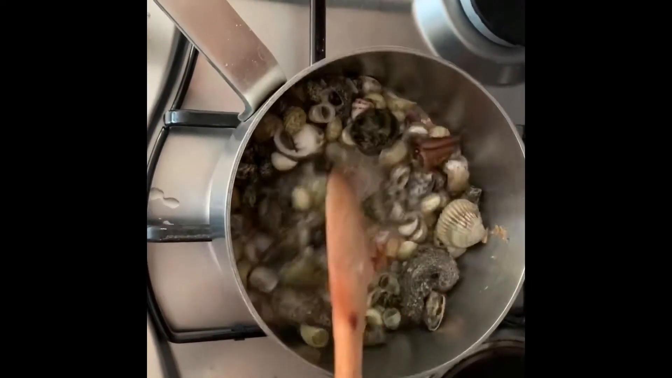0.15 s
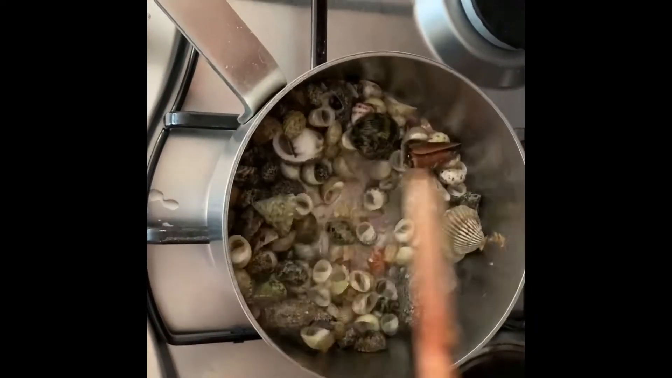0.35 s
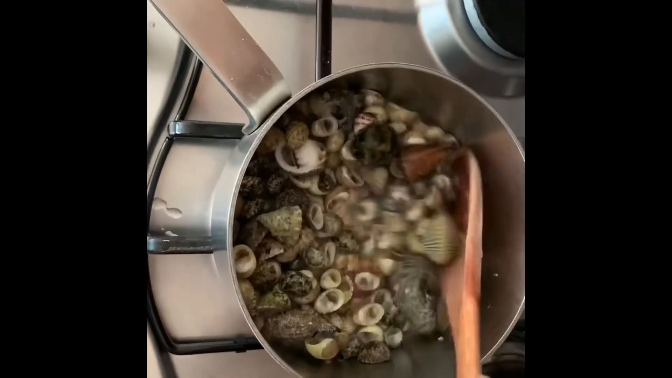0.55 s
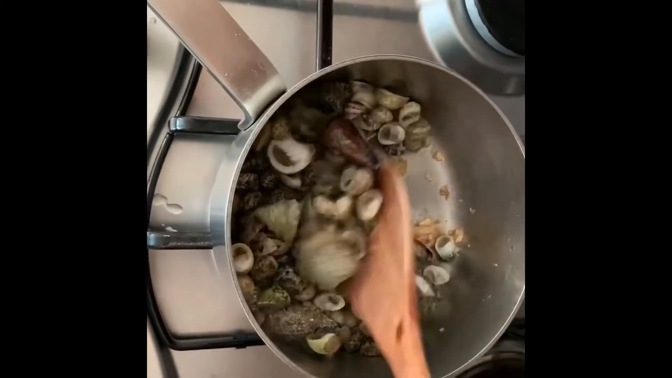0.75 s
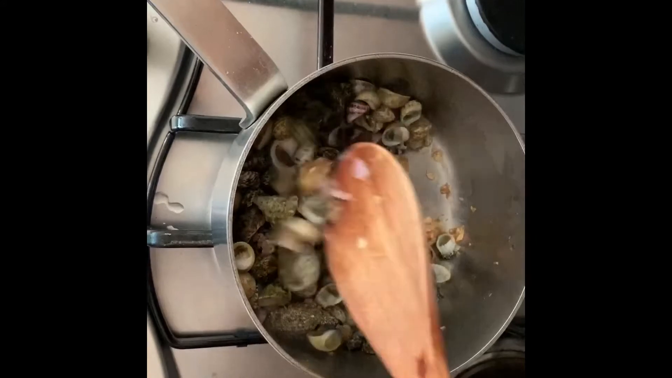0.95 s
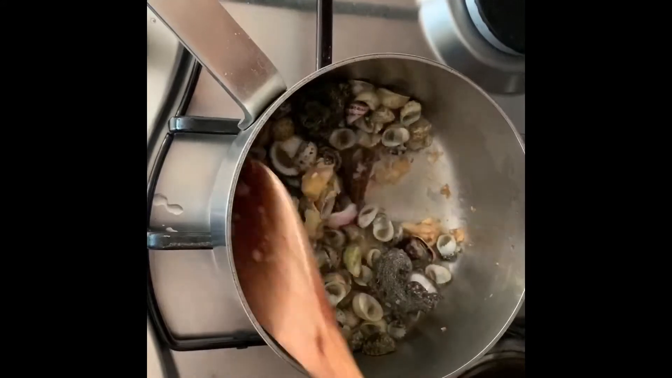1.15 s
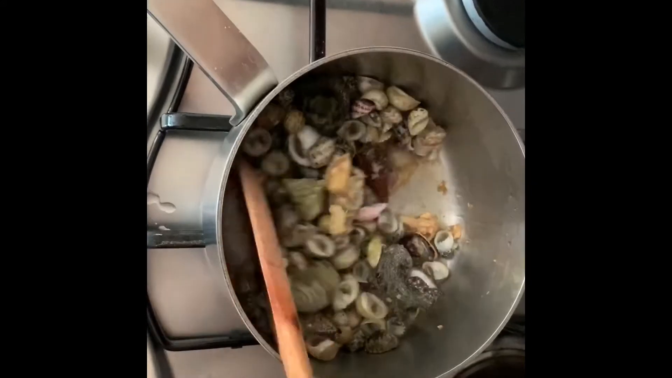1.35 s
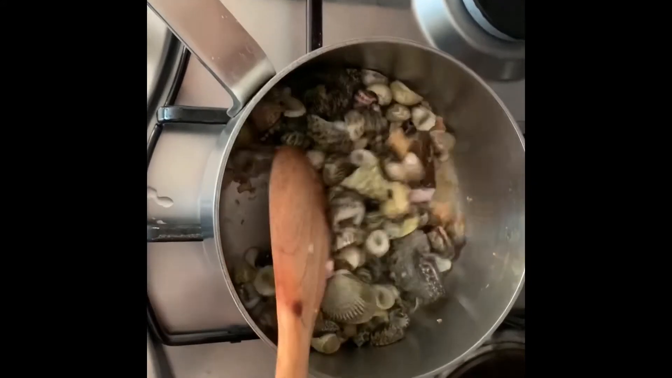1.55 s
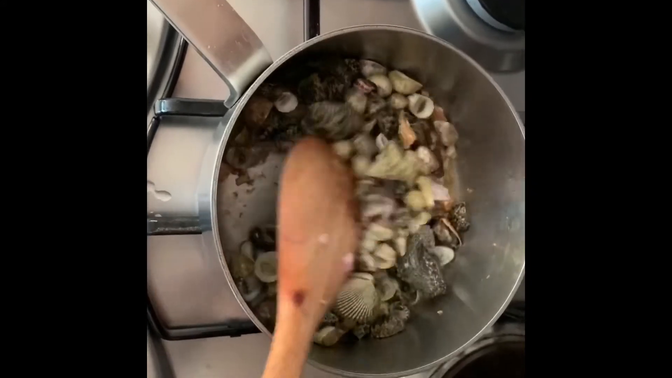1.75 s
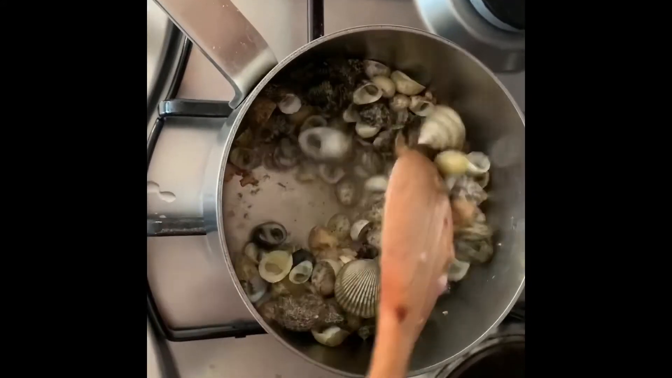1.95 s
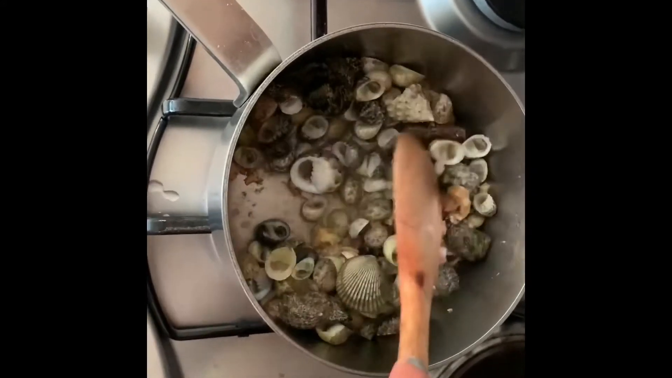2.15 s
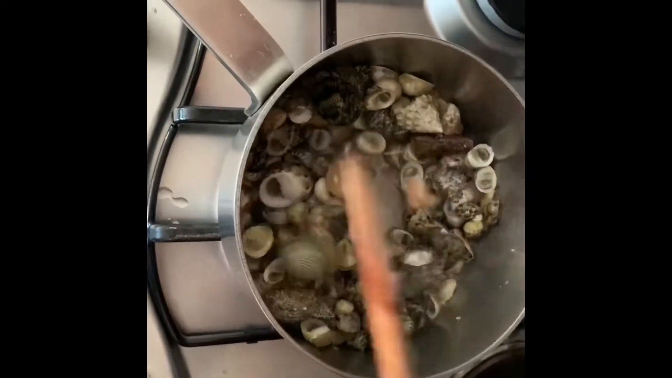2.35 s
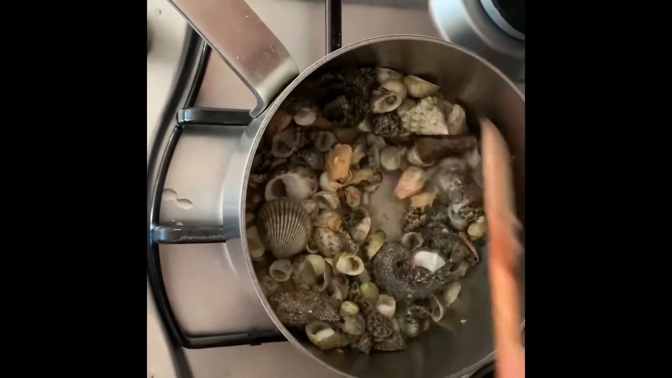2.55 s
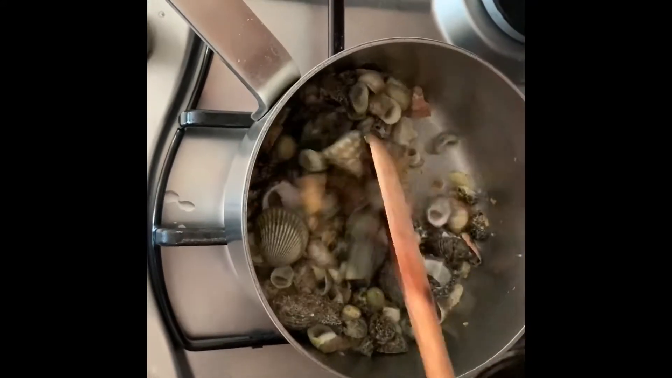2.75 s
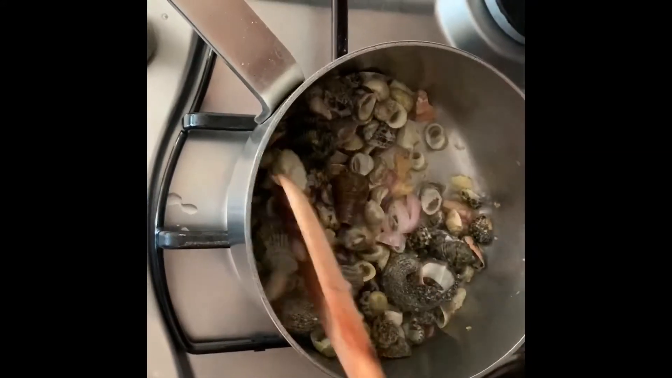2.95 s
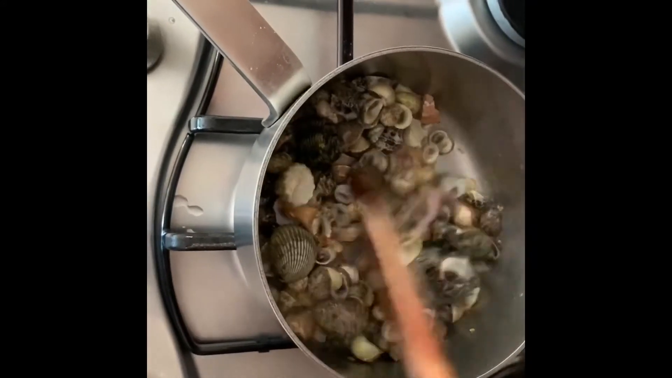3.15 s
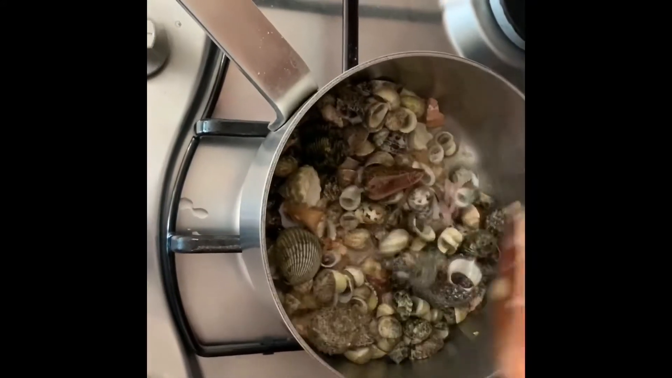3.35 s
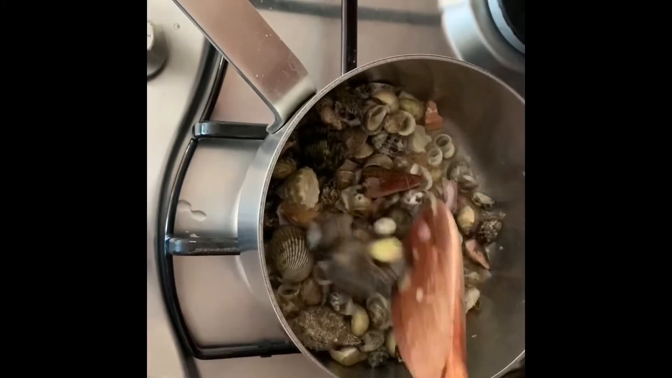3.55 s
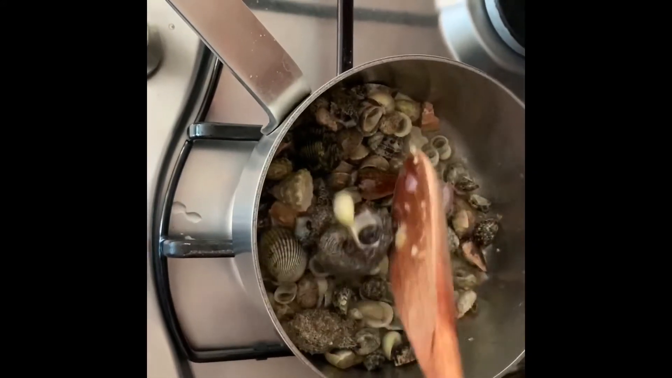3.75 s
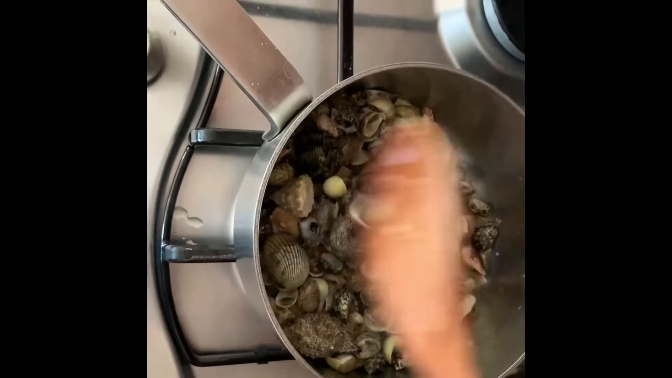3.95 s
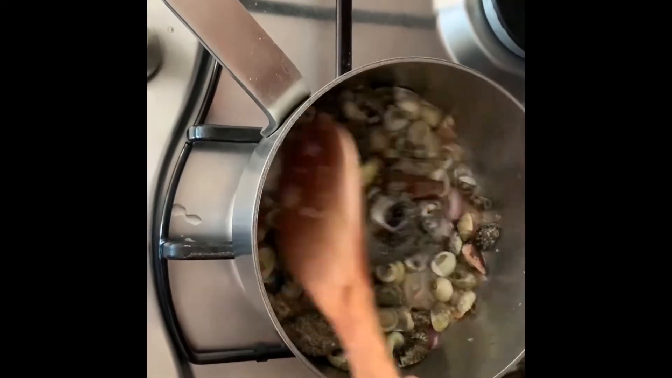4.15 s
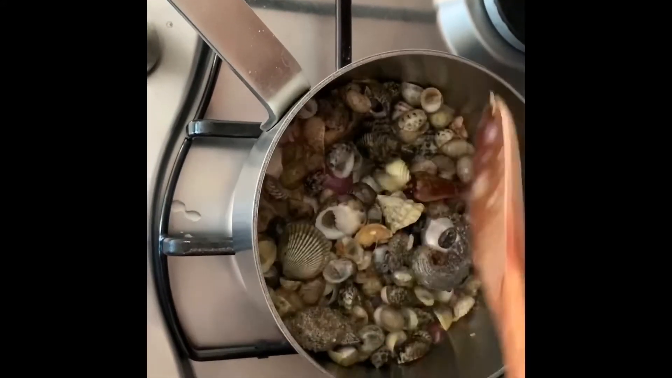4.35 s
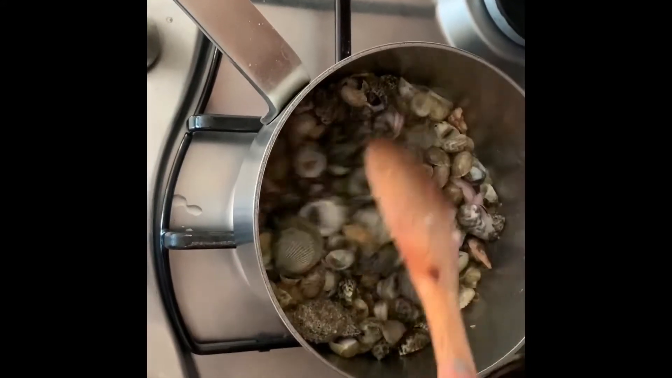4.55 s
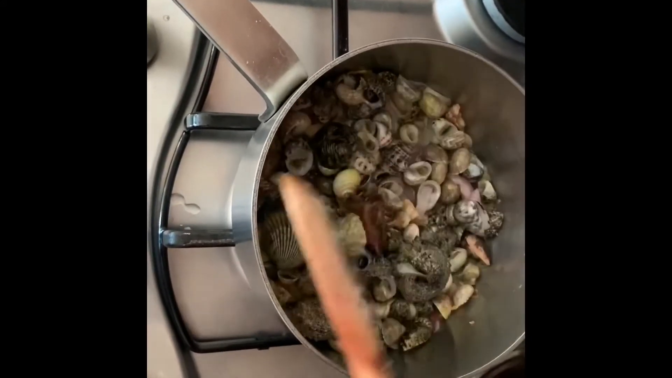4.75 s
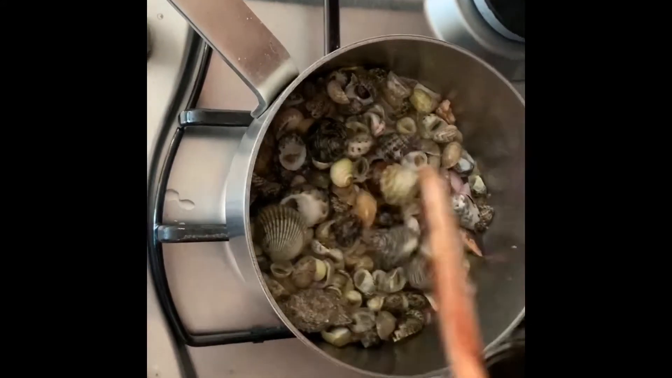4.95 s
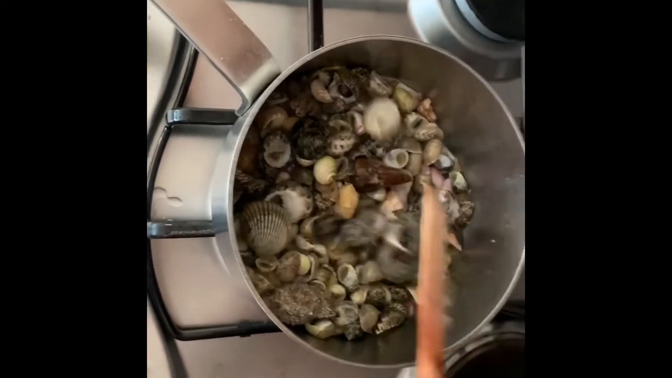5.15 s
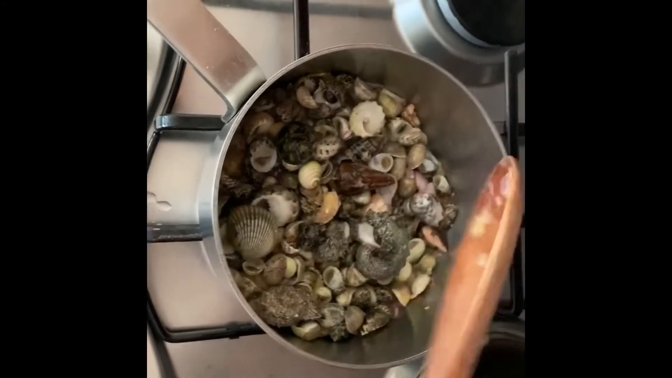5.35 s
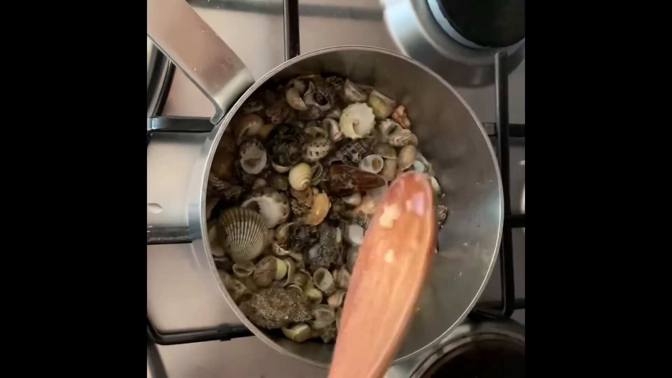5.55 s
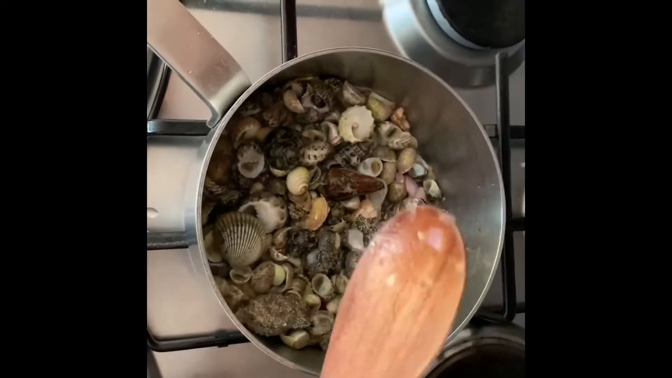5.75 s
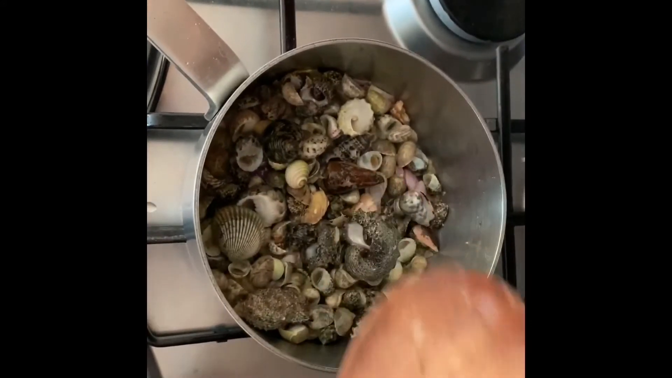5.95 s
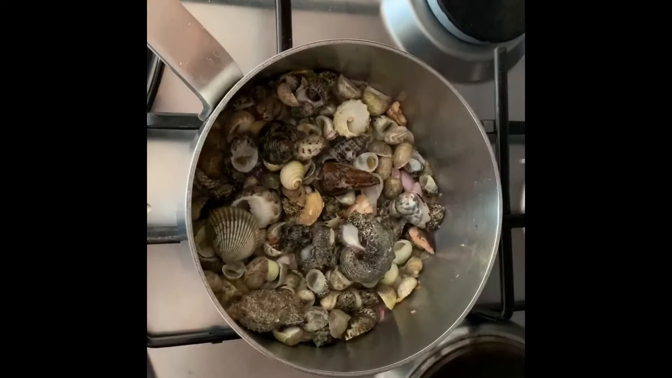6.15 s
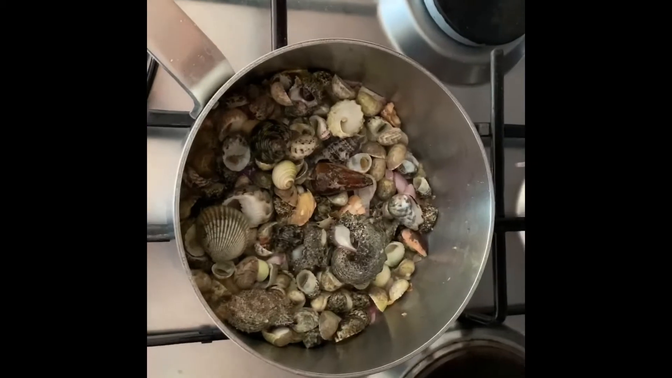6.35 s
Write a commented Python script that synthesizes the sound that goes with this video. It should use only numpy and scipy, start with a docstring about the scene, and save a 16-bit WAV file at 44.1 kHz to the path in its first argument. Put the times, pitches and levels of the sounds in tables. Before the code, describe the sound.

Two microphones close above a steel pot in a small kitchen catch a crackling, wet sizzle, loudest at 0 s and slowly sinking throughout. Stirring is already under way: shells rustle in uneven surges, with dry high clicks and short, lower knocks on steel. A faint airy whistle hovers and drops away by 1.4 s. Around 0.92-0.99 s a large shell gives a rapid cluster of bright ringing clinks; a strong one follows at 1.87 s, another at 2.9 s. Clicking is dense from 1.8 to 3 s. The spoon edge raps the wall at 3.3 s and harder at 3.95 s, with soft low bumps as the pot shifts. Sharp clicks cluster at 4.36 s, more bumps come near 5.05 s, then stirring thins. At 5.54 and 5.72 s the flat spoon pats the heap, each a hollow pop with a brief rattle. Faint fizz, settling ticks and low burner-fan hum remain.

```python
"""Shellfish sizzle in a hot steel pot on a gas hob while a wooden spoon stirs them; the kitchen hums low.
From the start bubbles pop, the heap rustles and clicks, and a faint whistle sinks away by 1.4 s.
Near 0.9 s a large shell clinks with ringing notes, and again later; the pot shifts with dull pushes.
From 3.3 s the spoon knocks the wall twice; near 5.6 s it pats the heap twice, a hollow pop and a rattle.
Pops and hiss are shaped noise, blows are fading tones; two spaced microphones listen from above."""
import sys
import numpy as np
from scipy import signal
from scipy.fft import rfft, irfft, next_fast_len
from scipy.io import wavfile
from scipy.ndimage import uniform_filter1d

SR = 44100
rng = np.random.default_rng(int(sys.argv[2]) if len(sys.argv) > 2 else 0)


def bounce(signal):
    """Save signal as a 16-bit WAV file at the path given by the first command-line argument."""
    frames = np.transpose(np.atleast_2d(signal))
    limited = np.clip(frames, -1, 1)
    pcm = np.round(limited * 32767).astype(np.int16)
    wavfile.write(sys.argv[1], SR, pcm)


N = 286634

# loudness of the frying liquid: (time [s], level [dB])
SIZZLE_LEVEL = [(0, -29), (1.1, -32.5), (2.1, -35), (3.7, -35.5), (4.7, -39.5), (5.5, -40), (6.5, -44)]
# tone colour of the bursting bubbles: (frequency [Hz], relative level [dB per Hz])
FIZZ_COLOUR = [(300, -34), (700, -9), (1500, -9.5), (3000, -5.5), (6000, -5), (8600, -3), (11000, -2.5),
               (15700, -2.5)]
# tone colour of shells rubbing together: (frequency [Hz], relative level [dB per Hz])
RUSTLE_COLOUR = [(600, -29), (1500, -13), (3000, -5), (5000, -0.5), (8000, 2), (11000, 1.5), (13500, -1),
                 (15700, -10)]
# resonances of the air in the pot: (frequency [Hz], width [Hz], relative level [dB])
POT_AIR = [(324, 120, -11.5), (933, 190, 0.5), (1170, 130, 0.5), (1560, 580, -0.5), (2200, 400, -1)]
# loudest contacts of shell on shell: (time [s], peak [dB], pitch [Hz])
CLICKS = [(0.1745, -5.5, 6870), (0.2575, -12, 6980), (0.401, -13, 6930), (0.4275, -10, 7300),
          (0.452, -12, 11500), (0.6906, -18, 6500), (0.8718, -16, 11600), (1.434, -20, 10900),
          (1.699, -16.5, 11200), (1.8006, -20, 10900), (1.829, -8, 10700), (1.8411, -6.5, 8340),
          (1.8787, -3, 6520), (1.9443, -14, 8500), (2.029, -13, 6920), (2.182, -11, 7190),
          (2.208, -11.5, 7080), (2.237, -17, 7610), (2.273, -18, 7000), (2.333, -15, 10200),
          (2.4632, -11.5, 7940), (2.4959, -6.5, 10230), (2.5214, -12, 10800), (2.5506, -19, 5400),
          (2.604, -14, 10500), (2.612, -13, 5310), (2.6535, -15, 6860), (2.6639, -10, 6400),
          (2.7125, -9, 10800), (2.79, -21, 7000), (2.81, -13.5, 7000), (2.823, -12, 11700),
          (2.841, -13, 10600), (2.8725, -13.5, 10200), (2.9754, -12, 7500), (2.984, -8.5, 6960),
          (3.101, -16, 7300), (3.138, -16, 11600), (3.187, -21, 10500), (3.3475, -12, 6930),
          (3.3845, -14, 10500), (3.3995, -12, 10800), (3.424, -16, 7000), (3.742, -20, 7080),
          (3.972, -11, 5900), (4.1205, -18, 6650), (4.145, -16, 7000), (4.3597, -6.5, 11170),
          (4.362, -2.5, 7070), (4.3669, -6, 7400), (4.3737, -14, 11000), (4.4589, -9, 7080),
          (4.546, -15, 6600), (4.564, -11.5, 5950), (4.7674, -20, 7140), (4.822, -15, 11000),
          (4.844, -26, 10400), (4.956, -32, 14500), (5.0671, -12, 6450), (5.0908, -16, 7240),
          (5.5437, -16, 6920), (5.721, -17, 6600), (5.7323, -11, 7300), (5.7417, -20, 7100)]
# loudest contacts of shell or spoon on steel: (time [s], peak [dB], pitch [Hz], time to fade 60 dB [s])
KNOCKS = [(0.172, -22, 1440, 0.016), (0.359, -26, 880, 0.017), (0.385, -21, 880, 0.013),
          (0.417, -21, 2840, 0.018), (0.646, -19, 1350, 0.017), (0.857, -19, 1480, 0.012),
          (1.045, -19, 937, 0.016), (1.058, -21, 1200, 0.011), (1.0675, -19, 1200, 0.011),
          (1.0885, -22, 1020, 0.012), (1.1, -21.5, 1560, 0.016), (1.141, -19, 2300, 0.02),
          (1.771, -24, 1140, 0.021), (1.823, -12, 1123, 0.039), (2.026, -17, 1070, 0.018),
          (2.182, -13.5, 2160, 0.012), (2.206, -24, 1360, 0.024), (2.236, -18, 2020, 0.012),
          (2.331, -28, 869, 0.018), (2.362, -22, 1170, 0.02), (2.461, -13, 1000, 0.013),
          (2.5063, -14.5, 1830, 0.0096), (2.527, -15.5, 2100, 0.018), (2.546, -19.5, 1115, 0.028),
          (2.554, -21, 2060, 0.02), (2.565, -25, 975, 0.017), (2.616, -21, 2430, 0.018),
          (2.632, -23.5, 1020, 0.055), (2.664, -24, 930, 0.018), (2.74, -24, 1000, 0.016),
          (2.806, -23, 1640, 0.023), (2.821, -23, 1520, 0.016), (2.872, -18, 1660, 0.021),
          (2.975, -11.5, 1380, 0.01), (2.981, -16, 1490, 0.017), (3.099, -25, 1450, 0.017),
          (3.349, -19, 845, 0.022), (3.389, -16.5, 1560, 0.021), (3.394, -18, 1560, 0.038),
          (4.104, -26, 1070, 0.022), (4.121, -10, 1300, 0.031), (4.318, -20.5, 920, 0.025),
          (4.361, -15, 2130, 0.025), (4.367, -13.5, 940, 0.032), (4.448, -23, 1190, 0.02),
          (4.492, -23, 1050, 0.024), (4.545, -26, 1000, 0.027), (4.726, -26.5, 750, 0.042),
          (4.753, -19, 1560, 0.017), (4.765, -29, 1000, 0.016), (4.84, -29, 2000, 0.017),
          (5.015, -24, 816, 0.019), (5.078, -24, 870, 0.027), (5.192, -23.5, 1120, 0.014)]
# blows on the large shell:
# (time [s], peak of upper notes [dB], brightness [dB per octave], peak of lowest note [dB])
CLINKS = [(0.9195, -11, 24, -38), (0.9366, -4, 6, -43), (0.9535, -10, 17, -34), (0.973, -6.5, 8, -35),
          (0.9864, -22, 17, -36), (1.8681, -1.5, -13, -22), (1.909, -13, 9, -41), (2.895, -16, -6, -28.5),
          (3.951, -27, 0, -26)]
# notes of the large shell, lowest first: (frequency [Hz], relative level [dB], time to fade 60 dB [s])
SHELL_NOTES = [(3883, 0, 0.18), (5360, -10, 0.05), (6580, -2, 0.091), (6930, -6, 0.062), (7275, 5, 0.042),
               (7480, 2, 0.025), (8100, 4, 0.048), (8450, 3, 0.054), (9080, -2, 0.038), (9800, -8, 0.047),
               (10440, -9.5, 0.18), (11400, -11, 0.033), (12050, -9, .03), (13950, -18, 0.067)]
# the spoon edge meets the wall: (time [s], peak [dB], brightness [dB per octave])
RAPS = [(3.293, -13.5, -10), (3.951, -5.5, 2.5)]
# notes of the pot wall: (frequency [Hz], relative level [dB], time to fade 60 dB [s])
WALL_NOTES = [(929, -13, 0.085), (1095, 6.5, 0.014), (1300, -13.5, 0.069), (1770, -11, 0.099),
              (2130, -19, 0.35), (2370, 9.5, 0.008), (2680, -20, 0.24), (3220, -8.5, 0.026)]
# the flat of the spoon pats the heap: (time [s], peak [dB])
PATS = [(5.5389, -6), (5.723, -7.5)]
# notes of pot and hob: (frequency [Hz], relative level [dB], time to fade 60 dB [s])
BODY_NOTES = [(65.2, -28.5, 0.53), (136.2, -27, 0.36), (189.6, -24, 0.19), (233.6, -31.5, 0.33),
              (317, -29, 0.046), (425, -37, 0.11), (747, -26.5, 0.26), (869, 8.5, 0.011), (890, -33, 0.14),
              (1015, -32, .2), (1276, -33, 0.22), (1440, -38, 0.3)]
# low bands of burner and fan: (frequency [Hz], width [Hz], level [dB])
HUM_BANDS = [(67, 53, -80), (130.4, 13.2, -52.5), (187.7, 14.5, -60.5), (245, 40, -62.5), (845, 220, -58),
             (1666, 170, -56.5)]
# tone colour of the dull roar below them: (frequency [Hz], relative level [dB per Hz])
ROAR_COLOUR = [(25, -36), (60, 6.5), (150, 0.5), (350, 0), (550, -7.5), (1000, -15.5), (3000, -36),
               (5000, -42)]
# how far the right microphone lags: (frequency [Hz], lag [half-turns])
MIC_LAG = [(0, 0), (860, .13), (1550, .04), (2300, .3), (3400, .44), (4700, 1), (6800, 2), (8900, 3),
           (11000, 4), (13100, 5), (14900, 6)]
# balance of the microphones: (frequency [Hz], left minus right [dB])
MIC_BALANCE = [(60, -1.5), (180, -4), (550, -6), (1650, -1.5), (4970, 0.5), (15000, 0)]
# tone colour of the shaken heap: (frequency [Hz], relative level [dB per Hz])
RATTLE_COLOUR = [(120, -3.5), (300, 2.5), (900, -10.5), (1500, -6.5), (2600, -14), (4000, -11.5),
                 (7000, -10), (10000, -11.5), (15000, -28)]
# the pot shifts on its grate: (time of middle [s], peak before roughness [dB], pitch [Hz], half length [s])
BUMPS = [(1.103, -45, 223.5, 0.14), (2.876, -43, 217, 0.18), (3.285, -41, 207, 0.04),
         (3.372, -37.5, 179, 0.087), (3.979, -38, 215, 0.053), (4.381, -45, 245, 0.15),
         (4.761, -41, 224, 0.05), (5.038, -35, 200, 0.023), (5.062, -31, 197, 0.021)]
# a faint airy whistle that sinks at its end: (time [s], pitch [Hz], level [dB])
WHISTLE_CURVE = [(0, 1497, -51), (.75, 1440, -40.5), (.9, 1526, -49), (1.2, 1518, -45.5), (1.27, 1437, -41),
                 (1.33, 1300, -47), (1.4, 1290, -80)]
# each push of the spoon through the heap:
# (peak time [s], rise [s], fall [s], shell rustle [dB], rumble on the pot floor [dB])
PUSHES = [(.0, 0.12, 0.13, -32, -37.5), (.17, 0.083, 0.28, -26.5, -40.5), (0.429, 0.084, 0.075, -24, -33),
          (0.59, 0.047, 0.089, -25, -35), (.645, 0.14, .11, -24.5, -45), (.93, 1, 0.037, -31, -44),
          (1.09, 0.05, 0.048, -37, -37), (1.12, 0.052, 0.057, -25.5, -48), (1.46, 0.46, 0.17, -34, -42.5),
          (1.86, 0.24, 0.14, -29, -37.5), (2.21, 0.15, 0.14, -27.5, -38), (2.36, 0.092, 0.11, -34, -39.5),
          (2.479, 0.035, 0.099, -28.5, -32.5), (2.55, 0.076, 0.33, -26, -36.5),
          (2.83, 0.2, 0.13, -31, -38.5), (2.99, 0.08, 0.22, -28, -37), (3.39, 0.12, 0.09, -24.5, -38),
          (3.98, 0.016, 0.077, -22.5, -30.5), (4.15, 0.093, 0.06, -23, -33.5),
          (4.37, 0.012, 0.31, -31, -51), (4.52, 0.16, 0.07, -28, -35.5), (4.77, 0.036, 0.078, -31, -36),
          (4.84, .06, 0.032, -33, -41), (5.09, 0.066, 0.051, -31, -39)]
# the heap between pushes: (time [s], rustle [dB], rumble [dB])
SETTLING = [(0, -37, -60), (2.0, -46, -82), (3.6, -46.5, -47.5), (4.7, -52, -61), (5.4, -50, -54),
            (6.5, -46, -58)]

EDGE_HZ = 15800  # top of the sound that the microphones keep
PAD = next_fast_len(N + 12000)
HZ = np.fft.rfftfreq(PAD, 1 / SR)
AFTER = np.arange(16000) / SR  # time since a blow [s]
SWELL_DB = 12  # a push climbs this much in its rise time and drops this much in its fall time
LOOSE_PER_S = 90  # small unplanned contacts each second
TICK_S = .00008  # how long two hard surfaces touch
CLICK_T60_S = 0.029
# smallest peaks over the rustle and the rumble, roughly, and how unevenly the peaks exceed them
LOOSE_CLICK_DB, LOOSE_KNOCK_DB, LOOSE_SPREAD_DB = 4, 4.5, 1.8
LOOSE_CLICK_T60_S, LOOSE_KNOCK_T60_S = 0.04, 0.02


def amp(db):
    """Turns a level in dB into a gain."""
    return 10 ** (np.asarray(db) / 20)


def evened(x):
    """Scales a sound to an rms of 1."""
    return x / np.sqrt(np.mean(x ** 2) + 1e-20)


def read(points, hz):
    """Reads a tone colour table at any frequency, on a logarithmic pitch scale."""
    f, value = np.transpose(points)
    return np.interp(np.log(hz + 1), np.log(f + 1), value)


def follow(rows, axis):
    """Draws one column of a time table as a curve with a value for every sample."""
    rows = np.array(rows)
    return np.interp(np.arange(N) / SR, rows[:, 0], rows[:, axis])


def shaped(x, gain):
    """Gives a sound a tone colour and an rms of 1."""
    return evened(irfft(rfft(x, PAD) * gain, PAD)[..., :N])


def peaks(modes):
    """Adds the power of several resonances; the width is taken 6 dB below each top."""
    power = 0
    for hz, width, db in modes:
        power = power + amp(2 * db) / (1 + (2 * (HZ - hz) / width) ** 2) ** 2 / width
    return np.sqrt(power)


def add(mix, s, sound):
    """Adds a sound to the mix at a time in seconds."""
    part = mix[round(s * SR):][:len(sound)]
    part += sound[:len(part)]


def smooth_noise(shape, size):
    """Averages noise twice so that it drifts slowly."""
    return uniform_filter1d(uniform_filter1d(rng.standard_normal(shape), size=size), size=size)


def grains(per_s, spread_db, wet, tail_s, ring_share, low_hz, count=12):
    """Sparse uneven pops from several places, each with a short ring and a smear off the pot walls."""
    size = amp(spread_db * np.minimum(rng.exponential(1, N), 5))
    size = size * (rng.random(N) < per_s / SR)
    place = rng.integers(0, count, N)
    t = AFTER[:4096]
    out = np.zeros((2, N))
    for k, hz in enumerate(np.geomspace(low_hz, 6 * low_hz, count)):
        pop = (t == 0) + ring_share * np.sin(2 * np.pi * hz * t) * amp(-60 * t / 0.056)
        smear = rng.standard_normal((2, len(t))) * amp(-60 * t / tail_s)  # different in each ear
        both = pop + wet * smear / np.linalg.norm(smear[0])
        out += signal.oaconvolve((size * (place == k))[None], both, axes=1)[:, :N]
    return out


def burst(hz, t60, spread, crack, tick, rise_turns):
    """A small hard contact: a broad tick, a sharp crack and a few short notes; peak 1."""
    t = AFTER[:3072]
    notes = 2.6 * np.sin(2 * np.pi * hz * t)
    for c in rng.uniform(-.3, 1, 4):  # four more notes, mostly above the first
        notes += np.sin(2 * np.pi * hz * np.exp(spread * c) * t)
    white = rng.standard_normal(len(t))
    noise = signal.lfilter([1, .6, -1, -.6], [1], white)  # broad, without bass or the very top
    snap = crack * noise * (amp(-60 * t / 0.065) + 2.75 * amp(-60 * t / 0.011))
    snap += tick * (1 - t / TICK_S) * np.exp(-t / TICK_S)
    swell = 1 - np.exp(-(t * hz / rise_turns) ** 2)
    out = (notes * swell + snap) * amp(-60 * t / max(t60, .004))
    return np.sign(white[0]) * out / abs(out).max()  # pushes first inwards or outwards by chance


def ring(modes, tilt_db, scatter_db, rise_s, slow_hz=0, waver=0):
    """One blow starts fading notes of uneven strength that may waver, those under slow_hz swelling later; peak 1."""
    chance = rng.standard_normal(len(modes))
    drift = evened(smooth_noise((len(modes), len(AFTER)), 800))
    drift = 1 + waver * drift * np.minimum(AFTER / 0.022, 1)
    out = np.zeros(len(AFTER))
    for (hz, db, t60), c, d in zip(modes, chance, drift):
        level = amp(db + scatter_db * c + tilt_db * np.log2(hz / 7000) - 60 * AFTER / t60)
        swell = 1 - np.exp(-(AFTER / (rise_s * max(1, slow_hz / hz))) ** 2)
        out += level * swell * d * np.sin(2 * np.pi * hz * AFTER)
    return out / abs(out).max()


def sizzle():
    """Tiny bubbles burst by the thousand in the frying liquid."""
    pops = grains(4000, 3.64, 1.0, 0.07, 0.049, 2000)
    return amp(follow(SIZZLE_LEVEL, axis=1)) * shaped(pops, amp(read(FIZZ_COLOUR, HZ)))


def effort(axis):
    """Level of one layer of the stirring (0 rustle, 1 rumble): the settling heap plus every push."""
    t = np.arange(0, N + 64, 64) / SR
    power = np.zeros(len(t))
    for peak_s, rise_s, fall_s, *levels in PUSHES:
        away = np.maximum((peak_s - t) / rise_s, (t - peak_s) / fall_s)
        power += amp(levels[axis] - SWELL_DB * away) ** 2
    settling = amp(follow(SETTLING, axis=axis + 1))
    return np.sqrt(np.interp(np.arange(N) / SR, t, power) + settling ** 2)


def stirring():
    """Shells tick against each other in clumps, and bump the floor of the pot, which colours them."""
    clumps = amp(1.2 * evened(uniform_filter1d(rng.standard_normal(N), 450)))
    ticks = grains(2000, 2.93, 0.63, 0.066, 0.086, 2500, count=24)
    rustle = shaped(ticks * clumps, amp(read(RUSTLE_COLOUR, HZ)))
    thuds = grains(300, 2.5, 0.63, 0.087, 0.031, 799)
    rumble = shaped(thuds * clumps, peaks(POT_AIR))
    return effort(axis=0) * rustle + effort(axis=1) * rumble


def loose():
    """Small clicks and knocks at random moments, as strong as the stirring is."""
    mix, rustle, rumble = np.zeros(N), effort(axis=0), effort(axis=1)
    for when, size, pitch, kind in rng.random((int(LOOSE_PER_S * N / SR), 4)):
        at = int(when * N)
        size_db = -LOOSE_SPREAD_DB * np.log(size + 0.012)  # many small, few large
        if kind < .5:
            level = rustle[at] * amp(LOOSE_CLICK_DB + size_db)
            hit = burst(5400 * 2.5 ** pitch, LOOSE_CLICK_T60_S, .3, 0.77, 2.4, 1.1)
        else:
            level = rumble[at] * amp(LOOSE_KNOCK_DB + size_db)
            hit = burst(800 * 3.5 ** pitch, LOOSE_KNOCK_T60_S, 0.97, 0.36, 3.6, 0.99)
        add(mix, at / SR, level * hit)
    return mix


def hum():
    """Burner and fan: wavering low bands of noise over a dull roar, nearly alike in both ears."""
    near, a, b = rng.standard_normal((3, N))
    air = near + 0.07 * np.array([a, b])
    bands = sum(amp(db) * shaped(air, peaks([(hz, width, 0)])) for hz, width, db in HUM_BANDS)
    return bands + amp(-55.5) * shaped(air, amp(read(ROAR_COLOUR, HZ)))


def whistle():
    """A narrow band of noise that follows the pitch curve."""
    turn = np.exp(2j * np.pi * np.cumsum(follow(WHISTLE_CURVE, axis=1)) / SR)
    breath = smooth_noise((2, N), 150)
    tone = (turn * (breath[0] + 1j * breath[1])).real
    return amp(follow(WHISTLE_CURVE, axis=2)) * evened(tone)


def knocks():
    """Shell or spoon hits steel: short, lower notes spread wide."""
    mix = np.zeros(N)
    for s, db, hz, t60 in KNOCKS:
        add(mix, s, amp(db) * burst(hz, t60, 0.877, 0.23, 3.7, 1.0))
    return mix


def clicks():
    """Shell hits shell: short, high notes with a strong crack."""
    mix = np.zeros(N)
    for s, db, hz in CLICKS:
        add(mix, s, amp(db) * burst(hz, CLICK_T60_S, 0.35, 1.56, 8.5, 0.83))
    return mix


def kitchen(x):
    """Walls of pot and room return a short tail of sparse taps, different in each ear, without bass."""
    t = AFTER
    taps = rng.choice([-1., 1.], (2, len(t))) * (rng.random((2, len(t))) < .1)
    taps = taps * amp(-60 * t / 0.13) * (t > .0015)
    thin = signal.lfilter(*signal.butter(2, 650, "high", fs=SR), x)
    return signal.fftconvolve(thin[None], taps / np.linalg.norm(taps[0]), axes=1)[:, :N]


def clinks():
    """The large shell is struck: its upper notes, its lowest note and a hard contact sound together."""
    mix = np.zeros(N)
    for s, db, tilt_db, low_db in CLINKS:
        add(mix, s, amp(db) * ring(SHELL_NOTES[1:], tilt_db, 1.5, 0.0004, waver=.15))
        add(mix, s, amp(low_db) * ring(SHELL_NOTES[:1], 0, 0, .002, waver=.25))
        add(mix, s, amp(db - 4) * burst(8000, 0.021, 0.29, 2.1, 13, 1.8))
    return mix


def bumps():
    """The pot shifts on its grate: low tones swell and fade softly, each a little rough."""
    mix = np.zeros(N)
    for s, db, hz, length in BUMPS:
        t = np.arange(-length, length, 1 / SR)
        flutter = evened(uniform_filter1d(rng.standard_normal(len(AFTER)), size=150))[:len(t)]
        swell = np.exp(-(2.1 * t / length) ** 2)
        add(mix, s - length, amp(db) * (1 + 0.5 * flutter) * swell * np.sin(2 * np.pi * hz * t))
    return mix


def raps():
    """The spoon edge strikes the wall and its notes ring."""
    mix = np.zeros(N)
    for s, db, tilt_db in RAPS:
        add(mix, s, amp(db) * ring(WALL_NOTES, tilt_db, 0.19, 0.00064))
    return mix


def pats():
    """A hollow pop and the ring of pot and hob, while the shaken heap rattles as fading noise."""
    mix, shake = np.zeros(N), np.zeros(N)
    for s, db in PATS:
        add(mix, s, amp(db) * ring(BODY_NOTES, 0, 0.69, 0.0023, slow_hz=845, waver=.2))
        add(shake, s, amp(db - 60 * AFTER / 0.31) * (1 - np.exp(-AFTER / 0.00048)))
    rattle = shaped(rng.standard_normal(N), amp(read(RATTLE_COLOUR, HZ)))
    return mix + amp(-20) * shake * rattle


def scene():
    """Adds the pot, the blows with their echo, and the kitchen."""
    hits = loose() + knocks() + clicks() + clinks() + raps() + pats()
    return sizzle() + stirring() + hum() + whistle() + hits + amp(-7) * kitchen(hits) + bumps()


def record(dry):
    """The right microphone lags; treble bands fall by turns to the centre or the sides; the top is cut."""
    lag = np.pi * np.interp(HZ, *np.transpose(MIC_LAG))
    left, right = rfft(dry, PAD) * amp([[.5], [-.5]] * read(MIC_BALANCE, HZ))
    right = right * np.exp(-1j * lag)
    alike = np.cos(lag) * (HZ > 3500)  # 1 where the ears agree, -1 where they oppose
    mid_gain = np.clip((alike + 1.047 - 0.026 * HZ / 1000) / 0.19, .01, 1)
    side_gain = np.clip((.75 - alike) / 0.12, .01, 1)
    mid = (left + right) / 2 * mid_gain
    side = (left - right) / 2 * side_gain
    pair = irfft(np.array([mid + side, mid - side]), PAD)[:, :N]
    pair = np.tanh(pair)  # the input stage rounds the highest peaks
    low_pass = signal.firwin(401, EDGE_HZ, window=("kaiser", 10), fs=SR)
    return signal.oaconvolve(pair, low_pass[None], "same")


dry = scene()
out = record(dry)
bounce(out)
```